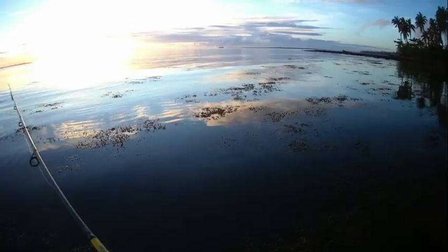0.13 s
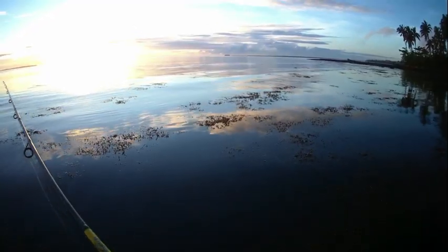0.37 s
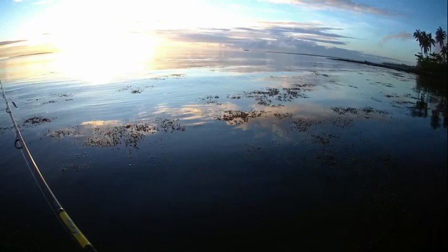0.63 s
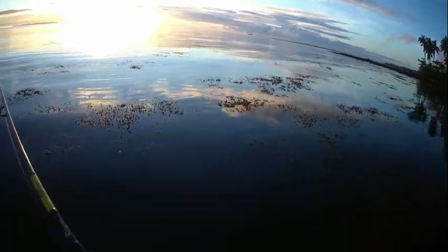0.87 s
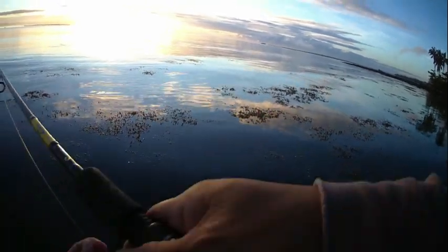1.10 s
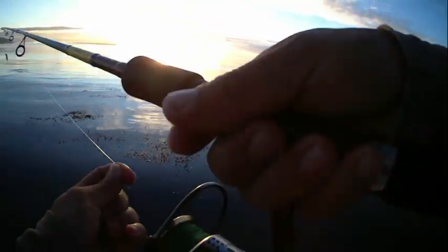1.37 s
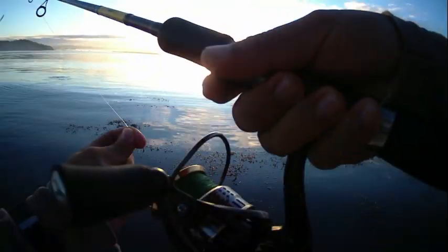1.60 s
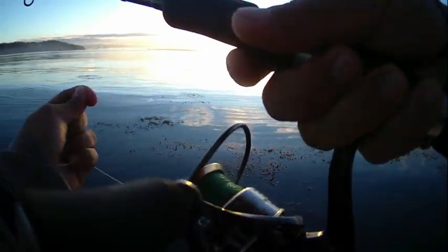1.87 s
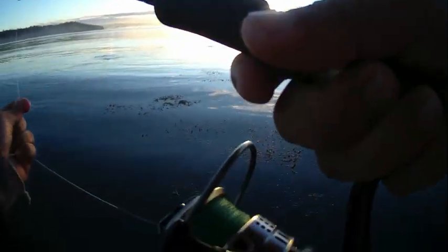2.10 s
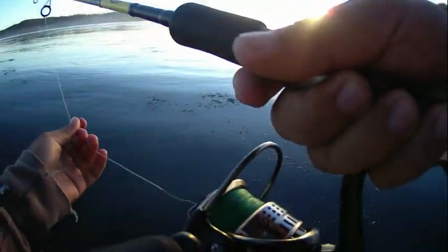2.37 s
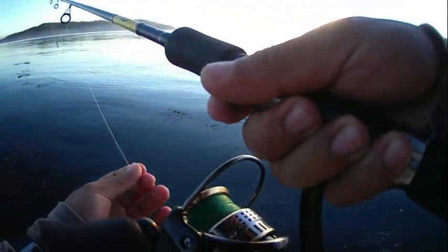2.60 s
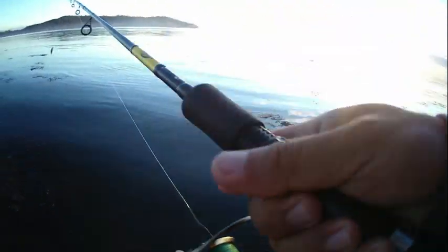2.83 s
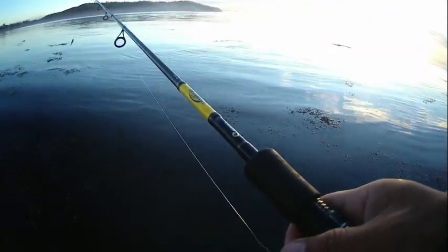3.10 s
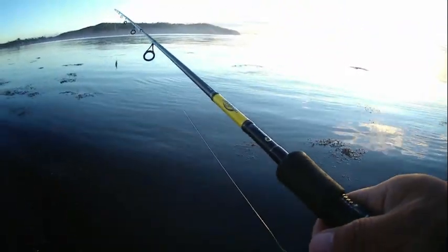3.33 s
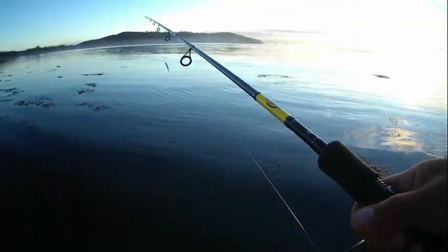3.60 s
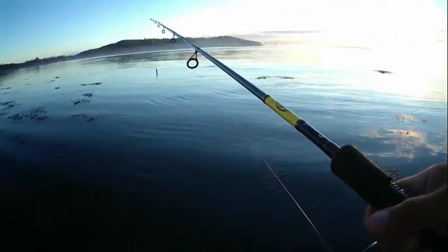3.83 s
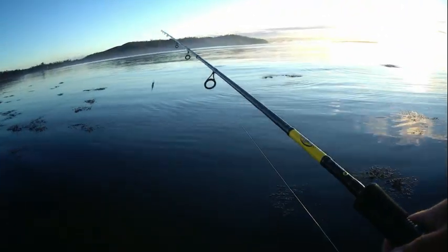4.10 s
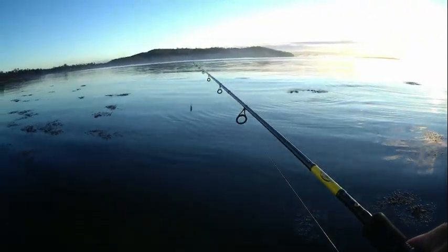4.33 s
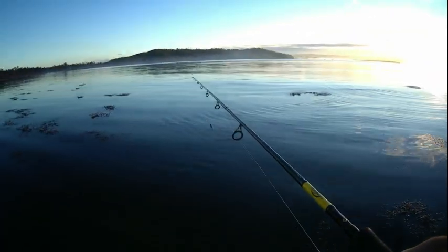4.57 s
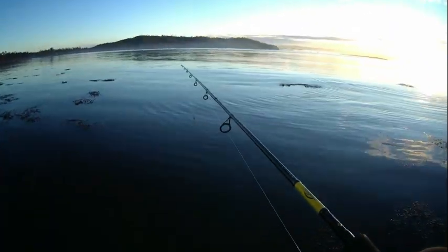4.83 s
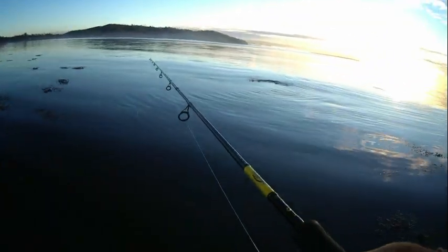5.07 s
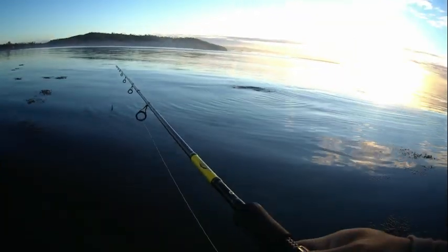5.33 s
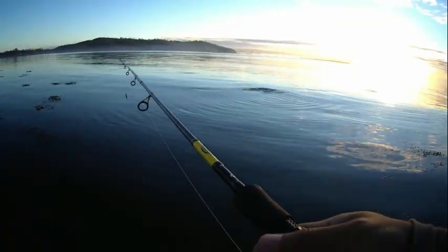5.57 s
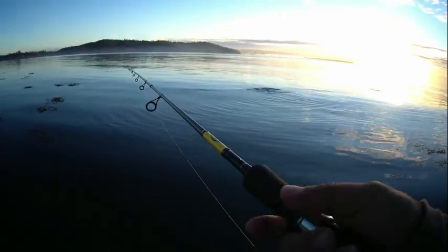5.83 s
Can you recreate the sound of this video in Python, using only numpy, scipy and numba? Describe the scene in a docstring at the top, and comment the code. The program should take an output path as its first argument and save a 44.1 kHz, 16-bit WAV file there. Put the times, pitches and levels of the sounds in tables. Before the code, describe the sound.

Open, calm water heard from a body-worn camera inside a plastic case, dull and slightly gritty. An opening splash cuts off abruptly, followed by two ratcheting pulls of reel line and scattered bubble plops. Three rounds of sloshing with small slaps against a leg come and go over a faint, steady far-off engine, ending almost still.

```python
"""Water sloshes and bubbles around the legs of an angler wading through calm shallows: swarms of gliding sines.
A single-cylinder boat engine thuds far across the water as shaped puffs, over a distant wash of coloured noise.
Line is pulled off a reel twice: its drag ratchet clicks as struck resonances. Wavelets slap a leg.
A chest camera in a plastic housing hears it all, sampling at 8 kHz; its straight-line upsampling
leaves mirror images of the sound above 4 kHz."""
import sys
import numpy as np
from scipy import signal
from scipy.fft import rfft, irfft, next_fast_len
from scipy.io import wavfile
from scipy.ndimage import uniform_filter1d
from numba import njit

SR = 44100
rng = np.random.default_rng(int(sys.argv[2]) if len(sys.argv) > 2 else 0)


def decibels_to_gain(level_db):
    """Convert a level in decibels to a linear amplitude gain (20 dB per decade)."""
    exponent = np.asarray(level_db, float) / 20
    return 10 ** exponent


def generate_wav(sig):
    """Save sig (samples, or channels by samples) to the path in sys.argv[1] as 16-bit PCM at SR."""
    pcm = np.round(np.clip(np.atleast_2d(sig).T, -1, 1) * 32767).astype(np.int16)
    wavfile.write(sys.argv[1], SR, pcm)


N = 262042  # length in samples, just under 6 s

# how hard the legs stir the water: time_s, level_db
STIR = [(0, -35), (0.128, -39), (0.131, -50.5), (.185, -50), (.205, -42.5), (.374, -49.5), (.518, -59),
        (.758, -66.5), (1.1, -66.5), (1.242, -55.5), (1.562, -49), (1.68, -45), (1.75, -49.5), (1.82, -55),
        (2.06, -58.5), (2.12, -63.5), (2.288, -67.5), (2.32, -50), (2.378, -44), (2.49, -41.5),
        (2.54, -34.5), (2.7, -39), (2.92, -49), (3.07, -59), (3.29, -60.5), (3.39, -46.5), (3.55, -39),
        (3.7, -38.5), (3.84, -45.5), (3.93, -52.5), (4.16, -54.5), (4.31, -44.5), (4.45, -38),
        (4.58, -38.5), (4.65, -42), (4.82, -41.5), (4.89, -50), (5.11, -63.5), (5.29, -68), (5.49, -62.5),
        (5.94, -76.5)]
# swarms of bubbles, large to small: low_hz, high_hz, bubbles_per_s, length_cycles, size_spread_db,
# rush_share (0 to 1, the part that is smooth noise)
GURGLE = (190, 520, 450, 5, 3.5, .2)
SLOSH = (450, 1700, 850, 12, 3.5, .15)
SPRAY = (1500, 3900, 2500, 9, 3.5, .25)
# scattered larger bubbles, same columns as the swarms
PLOP = (450, 1726, 60, 9.1, 1.8, .01)
# how a swarm follows the stir: level_db when the stir is at -40 dB, slope_db per dB of stir, lag_s
GURGLE_FOLLOWS = (-46.5, 0.94, .07)
SPRAY_FOLLOWS = (-50.5, 0.86, 0.0017)
PLOP_FOLLOWS = (-49.5, 0.79, 0.0066)
# far engine, firings counted up over time: time_s, firings
FIRINGS = [(0, -.39), (3.4, 114.26), (6, 201.7)]
# loudness of the far engine: time_s, level_db
ENGINE_LEVEL = [(0, -54), (.6, -53.5), (1.2, -56), (1.8, -53), (2.3, -56), (3.1, -56), (4.1, -58),
                (5.1, -58), (5.5, -60.5), (5.94, -60.5)]
# resonances of the engine's exhaust: pitch_hz, width_hz, level_db
EXHAUST = [(71, 92, -11), (181, 460, -3.5), (367, 1000, 8), (420, 160, -15)]
# tone of the far wash and air (only the shape counts): pitch_hz, level_db
SHORE_TONE = [(18, -25), (30, -10), (108, 3.5), (195, -1), (300, -18.5), (519, -13), (882, -11.5),
              (1250, -28.5), (3900, -67), (5070, -69), (8580, -120)]
# single bubbles that stand out: start_s, peak_db, first_hz, last_hz, length_ms
BUBBLES = [(.033, -22, 441, 417, 37), (0.049, -40, 1344, 1374, 28), (.115, -36, 700, 634, 6.2),
           (.2, -52, 1100, 1420, 13), (.233, -32, 1110, 1250, 3.8), (0.276, -30.5, 407, 330, 5.6),
           (.289, -42.5, 1435, 1250, 15), (.389, -41, 853, 1290, 21), (.487, -38.5, 725, 800, 7.2),
           (.621, -47, 900, 895, 15), (0.656, -54, 1250, 1170, 12), (.785, -51.5, 670, 700, 21),
           (.811, -60, 955, 1150, 24), (.783, -47.5, 1770, 1780, 4), (1.004, -49.5, 865, 760, 18),
           (1.21, -44, 880, 870, 5.7), (1.238, -39, 1530, 1430, 10), (1.254, -38, 793, 646, 15),
           (1.264, -42.5, 2100, 2190, 3.5), (1.354, -49.5, 1330, 1250, 9), (1.39, -47.5, 915, 920, 29),
           (1.45, -41, 840, 880, 15), (1.469, -46, 2260, 2190, 13), (1.477, -42, 1580, 1350, 4.4),
           (1.57, -29, 840, 800, 2.6), (1.589, -41, 1360, 1370, 17), (1.615, -35, 420, 420, 31),
           (1.615, -23.5, 890, 860, 10), (1.663, -33.5, 620, 590, 11), (2.001, -39.5, 604, 596, 11),
           (2.049, -41, 540, 525, 15), (2.072, -49, 2260, 2230, 8.6), (2.108, -37.5, 830, 1047, 9.1),
           (2.116, -49, 940, 1490, 22), (2.185, -56, 865, 1087, 28), (2.214, -52, 1040, 1060, 12),
           (2.298, -47.5, 627, 1190, 55), (2.325, -34, 880, 920, 6.8), (2.34, -42.5, 505, 640, 56),
           (2.353, -35, 1030, 1160, 9.6), (2.372, -41, 990, 1030, 26), (2.373, -35, 1790, 1590, 7.3),
           (2.39, -32, 700, 760, 13), (2.408, -30, 804, 750, 15), (2.437, -28.5, 653, 685, 11),
           (2.462, -27.5, 666, 730, 9.8), (2.515, -37, 1400, 1290, 8.1), (2.555, -25, 1530, 1190, 2.7),
           (2.581, -30, 1227, 1240, 16), (2.602, -23, 1370, 1410, 2.1), (2.647, -32, 1370, 1370, 5),
           (2.774, -42, 1236, 1167, 102), (2.792, -29.5, 452, 404, 18), (2.826, -28, 1300, 1400, 1.8),
           (2.908, -33.5, 690, 686, 8.4), (2.955, -38.5, 1270, 1250, 6.8), (3.015, -46, 810, 860, 19),
           (3.095, -49, 877, 950, 19), (3.344, -38, 694, 715, 12), (3.35, -39.5, 401, 768, 45),
           (3.376, -35.5, 2230, 2040, 2.1), (3.423, -33.5, 1750, 1800, 5.4), (3.51, -34, 716, 640, 20),
           (3.543, -25.5, 647, 960, 8.5), (3.55, -31, 1293, 1057, 25), (3.577, -28, 373, 500, 8.9),
           (3.595, -34.5, 1225, 1410, 30), (3.612, -21.5, 514, 430, 4.8), (3.657, -23.5, 1170, 1230, 5.7),
           (3.686, -27.5, 374, 342, 19), (3.727, -23.5, 1350, 1390, 5.7), (3.784, -34, 750, 690, 11),
           (3.824, -36, 1300, 1180, 5.5), (3.852, -34.5, 1700, 1750, 3.1), (4.096, -45.5, 1250, 1243, 26),
           (4.158, -47, 1500, 1770, 4.6), (4.24, -45, 700, 1160, 17), (4.281, -33, 1210, 1060, 2.2),
           (4.284, -36.5, 505, 563, 16), (4.317, -44, 1165, 1455, 50), (4.434, -34, 458, 477, 7.3),
           (4.436, -30.5, 927, 1136, 19.4), (4.466, -32.5, 1330, 1290, 7.2), (4.484, -38, 1250, 1190, 24),
           (4.513, -27, 377, 357, 23), (4.574, -32.5, 1225, 1096, 34), (4.633, -21.5, 512, 573, 11.4),
           (4.693, -28.5, 1100, 1250, 8.2), (4.743, -27.5, 1090, 1150, 3.8), (4.771, -39, 714, 532, 59),
           (4.953, -49, 1330, 980, 29), (4.81, -38, 1030, 1210, 7.9), (4.977, -38, 1130, 990, 6.2),
           (5.026, -39, 1070, 1144, 14), (5.265, -53.5, 1540, 1480, 11), (5.322, -49, 1820, 1090, 5.2),
           (5.361, -45.5, 776, 730, 7.7), (5.39, -43.5, 1500, 1350, 4), (5.489, -54, 472, 1040, 36),
           (5.511, -51.5, 1015, 1250, 21), (5.59, -47.5, 1670, 1720, 8.3), (5.619, -56, 2100, 1980, 6.6),
           (5.86, -54.5, 1440, 1740, 6.8), (5.895, -52, 1750, 1730, 5.1)]
# line pulled off the spool: loudness_db, then a list of time_s, ratchet_teeth passed
PULLS = [(-4, [(.1405, 0), (.1965, 6), (.218, 8), (.2436, 10), (.2605, 11), (.2855, 12), (.294, 13)]),
         (0, [(1.642, 0), (1.672, 1), (1.707, 3), (1.8234, 12), (1.9198, 18), (2.0409, 28), (2.0595, 29)])]
# resonances of the reel's spool: pitch_hz, width_hz, level_db
REEL = [(2750, 280, 3), (3600, 900, -7), (2250, 350, -7)]
# wavelets slapping a leg: start_s, peak_db
SLAPS = [(0.783, -48), (1.24, -34), (1.659, -46), (2.436, -29.5), (2.582, -31), (2.603, -38), (2.645, -44),
         (2.955, -48), (3.541, -29), (3.824, -31.5), (4.158, -35.5), (4.282, -51), (4.371, -26),
         (4.431, -27), (4.446, -28), (4.468, -29), (4.561, -22), (4.628, -35), (4.7, -26), (5.895, -44)]
# broad ring of a slap: pitch_hz, width_hz, level_db
LEG = [(1250, 1350, -8.5), (2200, 2150, -1.5), (550, 390, 5.5)]
# tone of the camera's plastic housing: pitch_hz, gain_db
HOUSING = [(30, 3), (150, 2), (500, -4.5), (950, -0.5), (1270, -1), (1650, 0), (2200, 4), (3000, -2.5),
           (3800, -1)]


def level(x, db):
    """Scale a sound to an average (rms) level in dB."""
    return x * decibels_to_gain(db) / np.sqrt(np.mean(x ** 2))


def curve(table):
    """Join the points of a table by straight lines in time."""
    s, value = np.transpose(table)
    return np.interp(np.arange(N) / SR, s, value)


def colour(x, table):
    """Shape the tone by points of pitch and dB, joined on a log pitch scale."""
    hz, db = np.transpose(table)
    size = next_fast_len(N)
    bins = np.maximum(np.arange(size // 2 + 1) * SR / size, 1)
    gain = decibels_to_gain(np.interp(np.log(bins), np.log(hz), db))
    return irfft(rfft(x, size) * gain, size)[:N]


def resonate(x, modes):
    """Ring several resonances side by side; every second one is turned upside down."""
    out = 0
    for k, (hz, width, db) in enumerate(modes):
        b, a = signal.iirpeak(hz, hz / width, SR)
        out = out + (-1) ** k * decibels_to_gain(db) * signal.lfilter(b, a, x)
    return out


def band(x, low_hz, high_hz):
    """Keep only the sound between two pitches."""
    return signal.sosfilt(signal.butter(2, [low_hz, high_hz], "band", fs=SR, output="sos"), x)


def walk(rate):
    """Wander between random levels, rate of them per second; their spread is a little under 1."""
    hold = int(SR / rate)
    steps = np.repeat(rng.standard_normal(N // hold + 1), hold)
    return uniform_filter1d(steps, hold)[:N]


@njit
def ring(start, size, first, last, length, count):
    """Bubbles: each sine swells fast, glides from first to last Hz and a little beyond, and dies away."""
    out = np.zeros(count)
    for k in range(len(start)):
        phase, span = 0., length[k] * SR
        for i in range(int(2.5 * span)):
            at = int(start[k] * SR) + i
            if 0 <= at < count:
                swell = 2.2 * (1 - np.exp(-6 * i / span))
                fade = np.exp(-2.3 * i / span)
                out[at] += size[k] * swell * fade * np.sin(phase)
            hz = first[k] + (last[k] - first[k]) * min(i / span, 1.3)
            phase += 2 * np.pi * hz / SR
    return out


def swarm(low_hz, high_hz, rate, cycles, spread_db, rush_share):
    """Random bubbles, a few large among many small, over a smooth rush of noise."""
    when, pitch, luck, life, rise = rng.random((int(rate * N / SR), 5)).T
    hz = low_hz * (high_hz / low_hz) ** pitch
    size = decibels_to_gain(-spread_db * np.log(luck + .02))
    last_hz = hz * (0.9215 + .4 * rise)
    length_s = cycles * (.5 + life) / hz
    pops = level(ring(when * N / SR, size, hz, last_hz, length_s, count=N), 0)
    rush = level(band(rng.standard_normal(N), low_hz, high_hz), 0)
    return level((1 - rush_share) * pops + rush_share * rush, 0)


def follow(at_40_db, slope, lag_s):
    """Gain of a swarm that trails the stir and swings less than it when slope is below 1."""
    s, db = np.transpose(STIR)
    later = s + np.where(s < .14, 0, lag_s)  # the sudden drop near 0.13 s is not delayed
    stir_db = np.interp(np.arange(N) / SR, later, db)
    return decibels_to_gain(at_40_db + slope * (stir_db + 40))


def strikes(table, modes, decay_s, rattle):
    """Each tick, with a short noisy tail, sets the resonances ringing."""
    s, db = np.transpose(table)
    ticks = np.zeros(N)
    ticks[(s * SR).astype(int)] = decibels_to_gain(db)
    fade = signal.lfilter([1], [1, -np.exp(-1 / (decay_s * SR))], ticks)
    tail = fade * rng.standard_normal(N)
    one_tick_peak = np.abs(resonate(signal.unit_impulse(SR // 10), modes)).max()
    return resonate(ticks + rattle * tail, modes) / one_tick_peak


def stirred_water():
    """Bubble swarms and a low push of water follow the stir; a shared flicker roughens three of the swarms."""
    stir_db = curve(STIR)
    opening = np.arange(N) < STIR[2][0] * SR  # up to the sudden drop in level
    slosh = decibels_to_gain(stir_db) * swarm(*SLOSH)
    gurgle = follow(*GURGLE_FOLLOWS) * swarm(*GURGLE)
    spray = follow(*SPRAY_FOLLOWS) * swarm(*SPRAY) * decibels_to_gain(2.5 * opening)  # the spray is brighter until the sudden drop
    flicker = decibels_to_gain(2.3 * walk(45) + 1.2 * walk(12))
    plops = follow(*PLOP_FOLLOWS) * swarm(*PLOP)
    push = level(band(rng.standard_normal(N), 55, 220), -30) * decibels_to_gain(0.56 * stir_db)
    return flicker * (slosh + gurgle + spray) + plops + push


def engine():
    """One soft puff a firing, uneven in size and time: a dip, then a push, then the ring of the exhaust."""
    count = curve(FIRINGS) - .02
    at = np.flatnonzero(np.diff(np.floor(count)))
    late, loud = rng.standard_normal((len(at), 2)).T
    pulses = np.zeros(N)
    place = at + (.0003 * SR * late).astype(int)
    pulses[np.clip(place, 0, N - 1)] = decibels_to_gain(1.6 * loud)
    ms = np.arange(-400, 401) / SR * 1000
    push = np.exp(-((ms - .5) / 0.57) ** 2)
    dip = 0.65 * np.exp(-((ms + 1.24) / 0.69) ** 2)
    thud = np.convolve(pulses, push - dip, "same")
    exhaust = level(resonate(thud, EXHAUST), -8.5)
    return level(level(thud, 0) + exhaust, 0) * decibels_to_gain(curve(ENGINE_LEVEL))


def shore():
    """Distant wash: coloured noise that drifts slowly in level around a faint average."""
    wash = level(colour(rng.standard_normal(N), SHORE_TONE), -63)
    return wash * decibels_to_gain(2.5 * walk(3))


def single_bubbles():
    """Bubbles that stand out, each a gliding sine that dies away."""
    s, db, first_hz, last_hz, ms = np.transpose(BUBBLES)
    return ring(s, decibels_to_gain(db), first_hz, last_hz, ms / 1000, count=N)


def pull(loud_db, table):
    """Each ratchet tooth ticks, rattles and rings the spool; line and drag washers hiss as it turns."""
    tick_db, slower_db, scatter_db = -40, 3.5, 2  # at 12.5 ms spacing, per octave slower, random; before loud_db
    fade_s = .03
    s, teeth = np.transpose(table)
    number = np.arange(int(teeth[-1]) + 1)
    at = np.interp(number, teeth, s)
    uneven, jitter = rng.standard_normal((len(number), 2)).T
    octaves_slower = np.log2(np.gradient(at) / .0125)
    db = tick_db + slower_db * octaves_slower + scatter_db * uneven  # a slower tooth lifts the pawl further
    clicks = strikes(np.transpose([at + .0004 * jitter, db]), REEL, .0022, .06)
    running = np.interp(np.arange(N) / SR, [s[0] - fade_s, s[1], s[-1], s[-1] + fade_s], [0, 1, 1, 0])
    rub = level(band(rng.standard_normal(N), 1900, 4500), -61)
    hiss = rub * running * decibels_to_gain(3 * walk(150))
    return decibels_to_gain(loud_db) * (clicks + hiss)


def reel():
    """Every pull on the line, one after the other."""
    return sum(pull(*row) for row in PULLS)


def slaps():
    """Wavelets slap a leg: ticks with a noisy tail set off a broad ring."""
    return strikes(SLAPS, LEG, decay_s=.007, rattle=.06)


def scene():
    """All sources together, as they reach the housing."""
    return (stirred_water() + engine() + shore() + single_bubbles() + reel() + slaps())[None]


def top_cut(x):
    """Nothing passes above the cut-off."""
    return signal.sosfilt(signal.butter(12, 15940, fs=SR, output="sos"), x)


def record(dry):
    """The housing colours the sound; 8 kHz sampling and straight-line upsampling leave mirror images."""
    cavity = resonate(dry[0], [(1290, 190, 0.7)])  # air cavity at the microphone port
    housed = colour(dry[0] + cavity, HOUSING)
    low_pass = signal.cheby1(6, .5, 3900, fs=SR, output="sos")  # anti-alias filter
    slow = signal.resample_poly(signal.sosfilt(low_pass, housed), 80, 441)  # down to 8 kHz
    joined = np.interp(np.arange(6 * len(slow)) / 6, np.arange(len(slow)), slow)  # straight lines, 48 kHz
    finished = signal.resample_poly(joined, 147, 160)[None, :N]  # to 44.1 kHz
    return top_cut(finished)


dry = scene()
out = record(dry)
generate_wav(out)
```